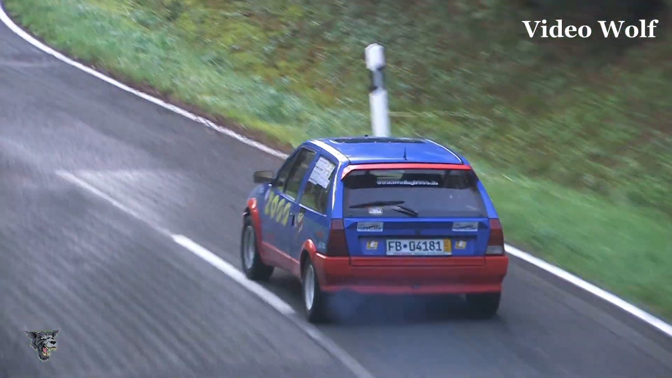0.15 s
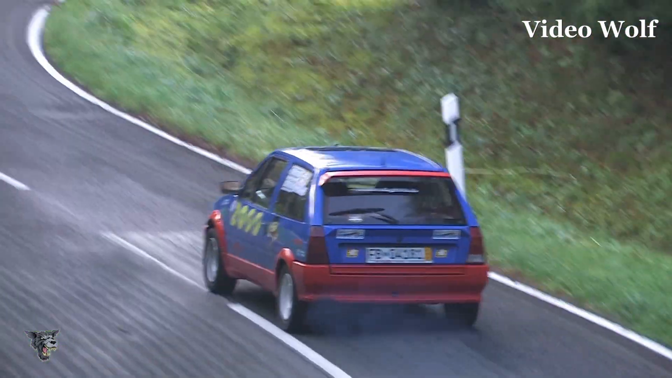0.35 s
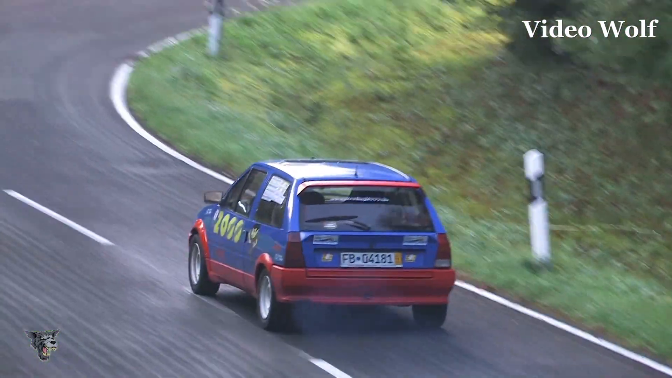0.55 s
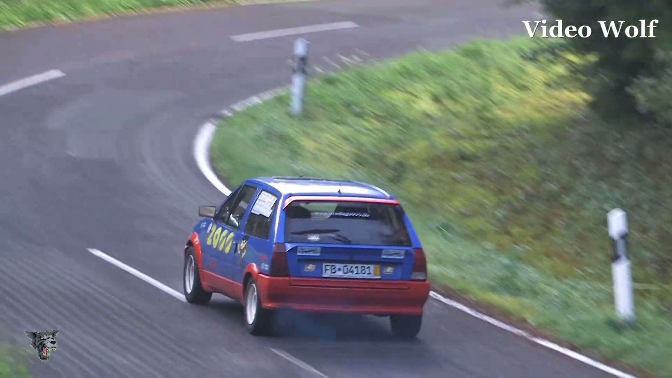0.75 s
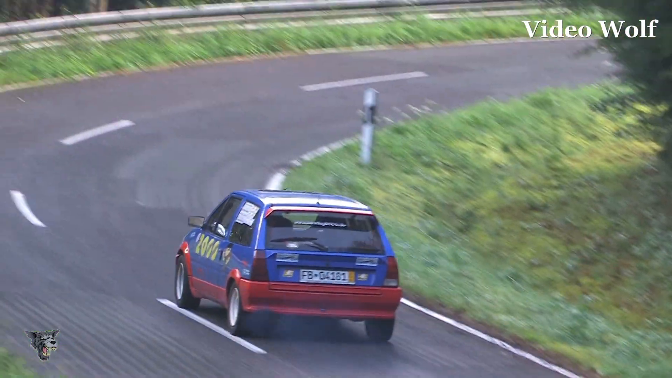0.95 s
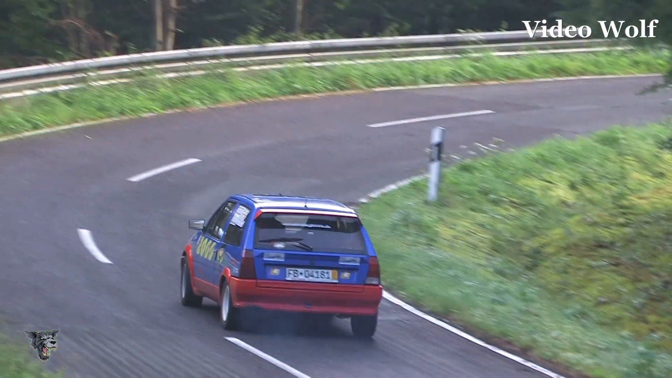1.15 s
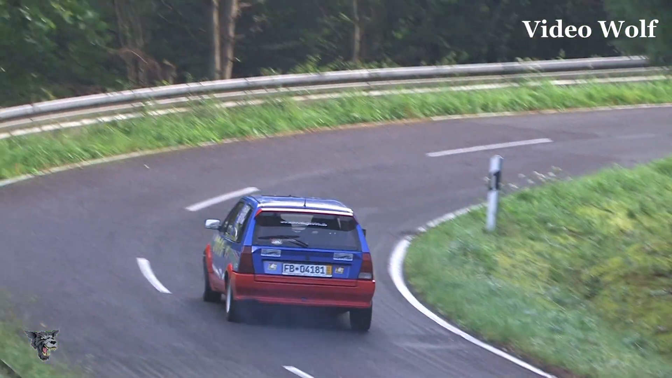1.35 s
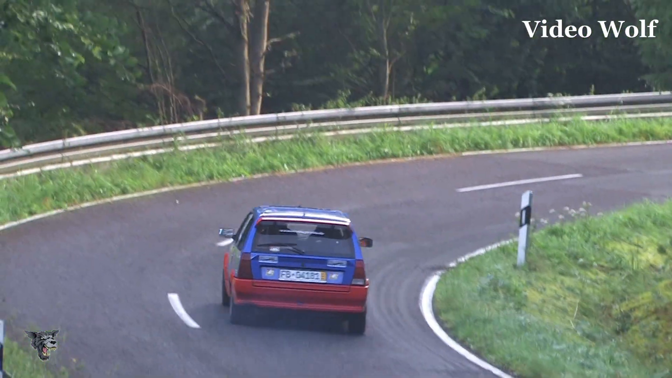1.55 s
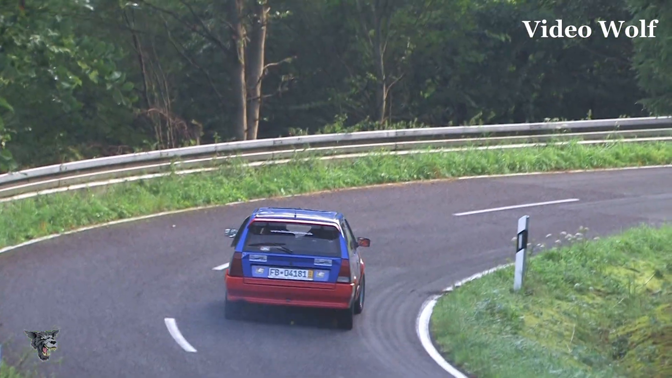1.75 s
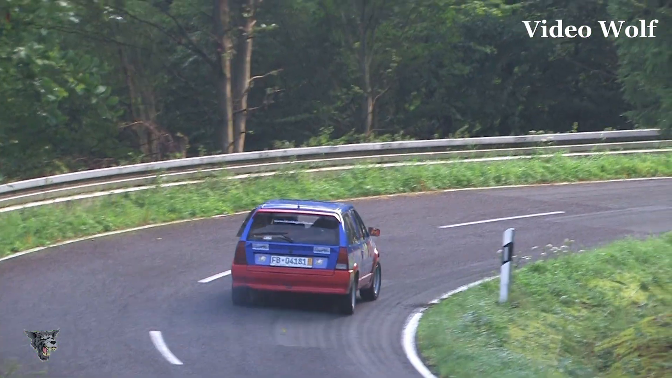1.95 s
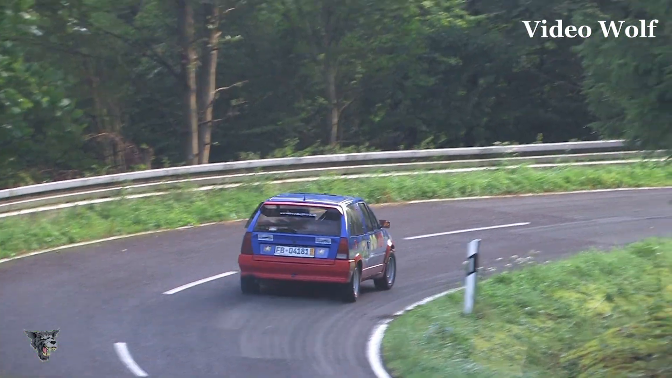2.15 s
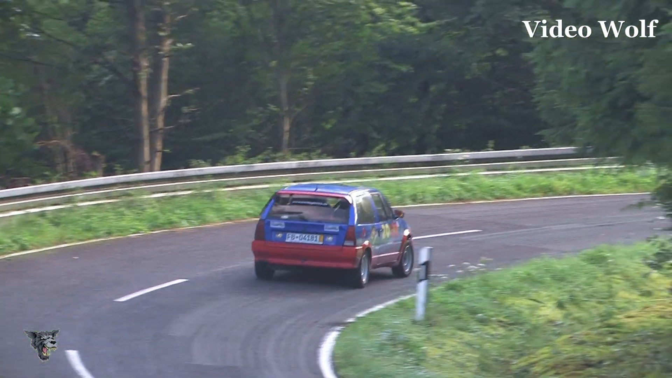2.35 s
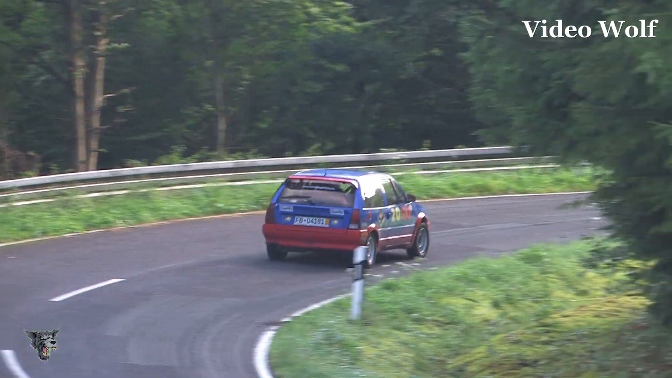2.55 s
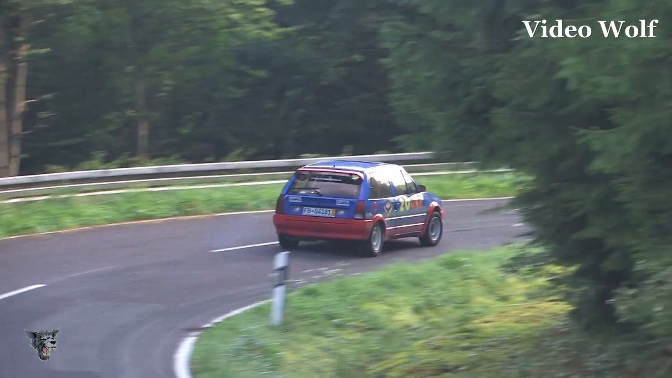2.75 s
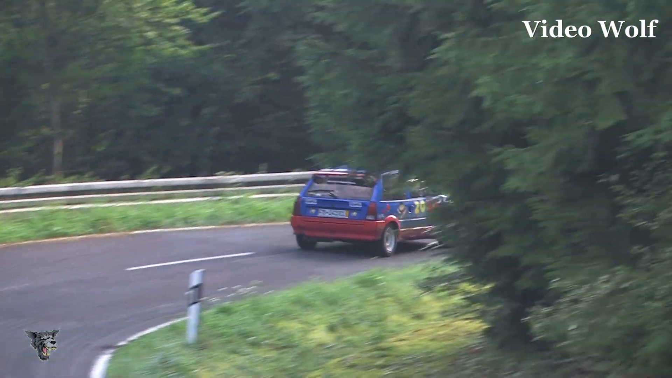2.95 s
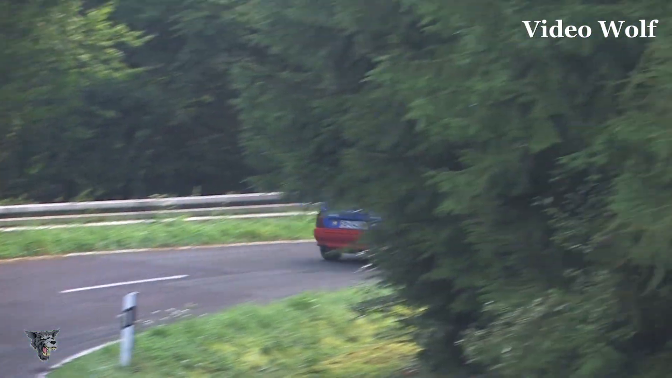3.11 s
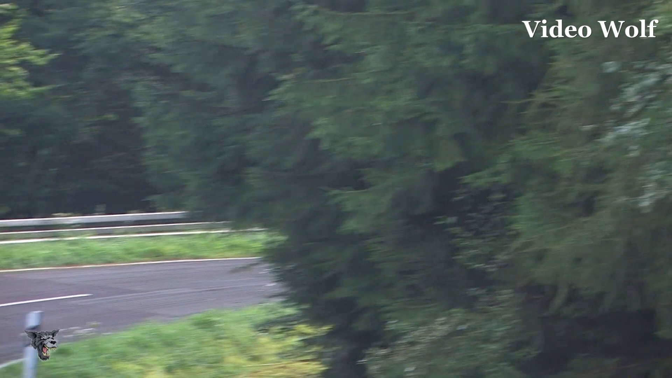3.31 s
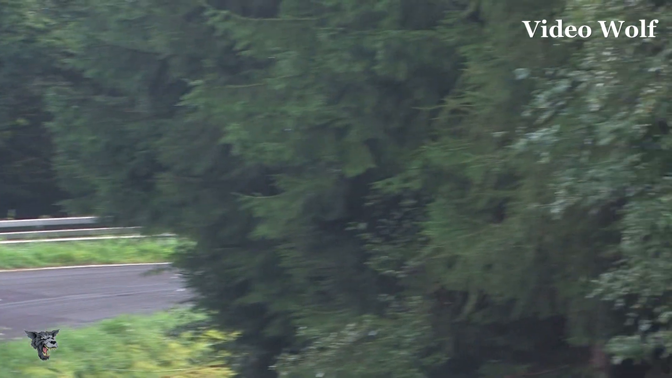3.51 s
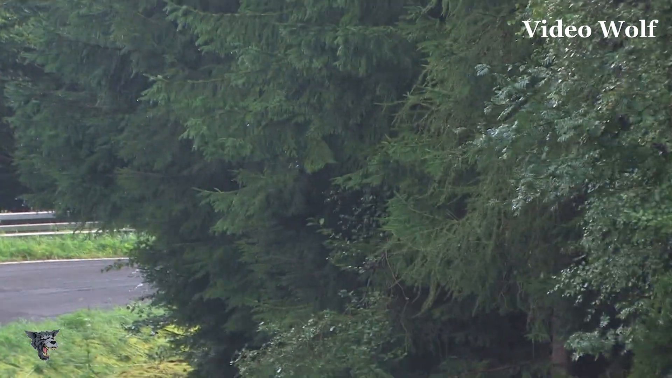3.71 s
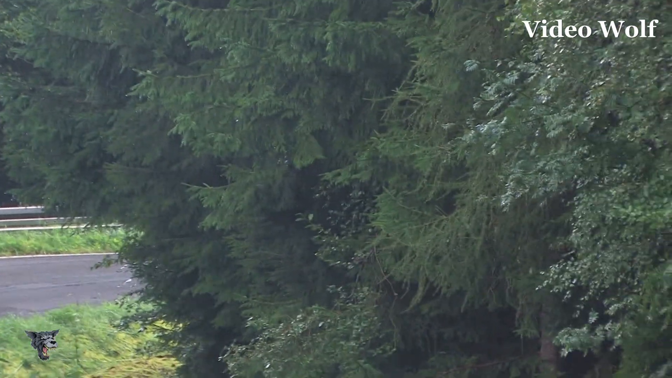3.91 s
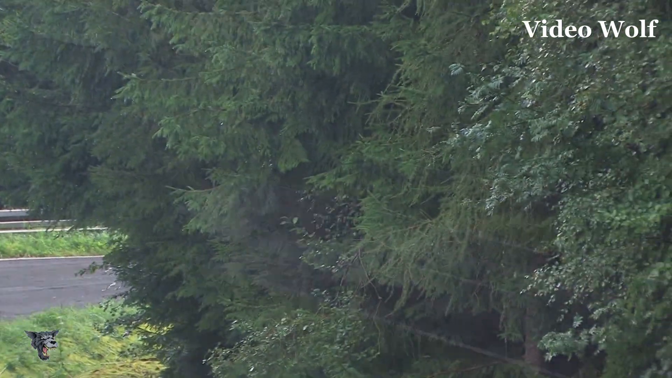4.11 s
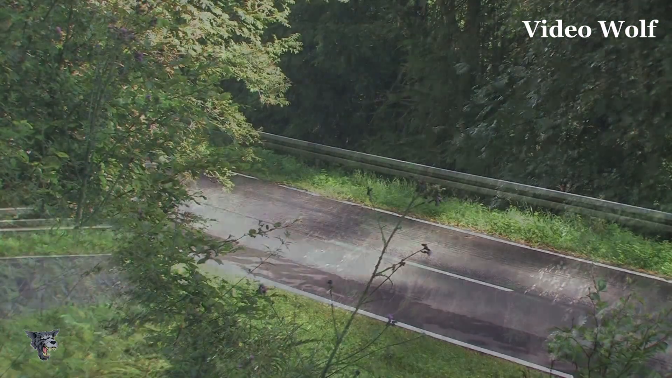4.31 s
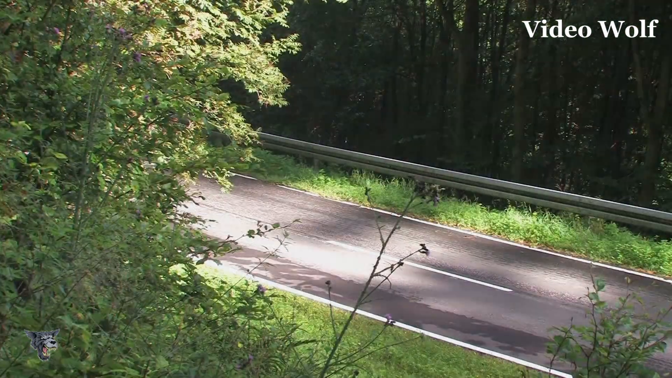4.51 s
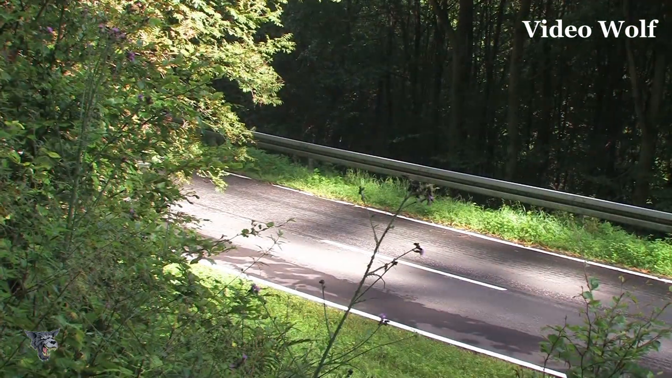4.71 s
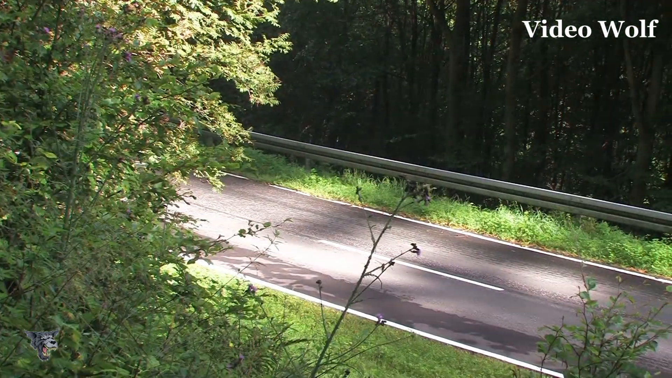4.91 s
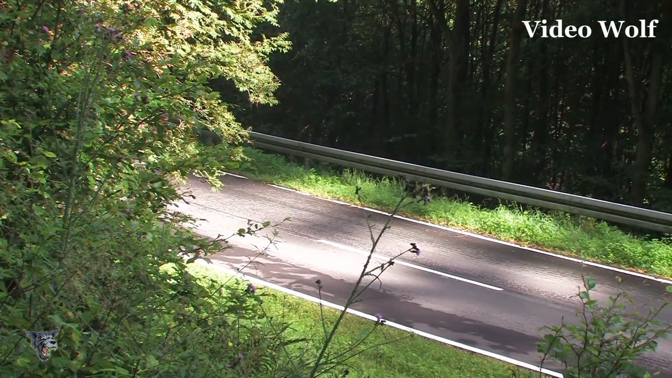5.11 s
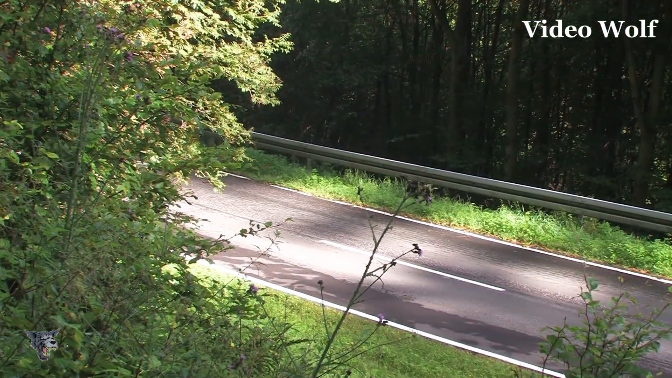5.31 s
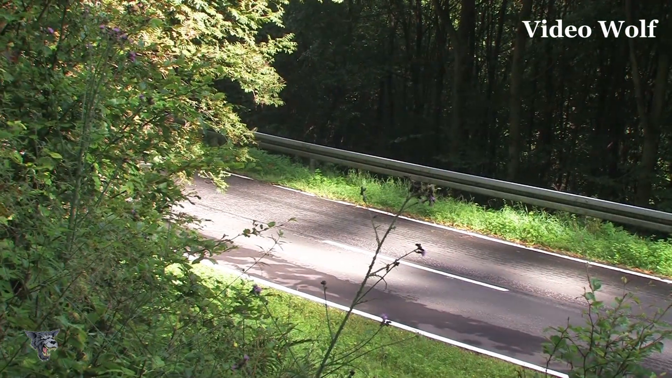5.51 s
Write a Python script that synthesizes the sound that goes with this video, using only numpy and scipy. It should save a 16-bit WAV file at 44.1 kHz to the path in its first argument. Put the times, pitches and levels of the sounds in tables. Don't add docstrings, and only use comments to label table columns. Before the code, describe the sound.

On a forest road, a small four-cylinder race car pulls away loudly, its pitch climbing, then lifts with a clunk, blips briefly, shifts up and fades behind trees. The scene crossfades to a quieter bend where an unseen second car approaches, its tyres squeal under braking and the engine drops to a lower note. A roadside microphone catches faint grit ticks.

```python
import sys
import numpy as np
from scipy import signal
from scipy.fft import rfft, irfft, next_fast_len
from scipy.io import wavfile
from scipy.ndimage import uniform_filter1d, map_coordinates

SR = 44100
rng = np.random.default_rng(int(sys.argv[2]) if len(sys.argv) > 2 else 0)


def how_loud(loudness_db):
    steps = np.asarray(loudness_db, float) / 20
    return 10 ** steps


def dump_mix(stems):
    frames = np.atleast_2d(stems).T
    limited = np.clip(frames, -1, 1)
    pcm = np.round(limited * 32767).astype(np.int16)
    wavfile.write(sys.argv[1], SR, pcm)


N = 245195
STEP = 8


# [t/s, f/Hz, level/dB]
ENGINE = [(0, 83.46, -19), (.2, 81.75, -18), (1.01, 88.76, -23.5), (1.32, 92, -21.5), (1.43, 95.3, -20.5),
          (1.69, 99.24, -20.5), (1.79, 97.85, -23.5), (2.05, 99.75, -22), (2.26, 104.1, -22),
          (2.44, 106.6, -23), (2.775, 85.58, -31.5), (2.885, 100.5, -31), (2.99, 91, -33),
          (3.12, 78.35, -27.5), (3.46, 71.95, -30.5), (3.76, 70.97, -29), (4.1, 70.75, -36.5),
          (4.5, 72.7, -47)]
# [t/s, level/dB]
ROAR_LEVEL = [(0, -33.5), (.35, -34), (.62, -35), (1.11, -36), (2.05, -36.5), (2.39, -35), (2.5, -36),
              (2.78, -40), (2.89, -36), (3.12, -36.5), (3.42, -43), (3.71, -44.5), (4.01, -52), (4.25, -55),
              (4.4, -55)]
# [multiple, level/dB x 4]
STRONG_ORDERS = [(3, -17, -11, -17, -17), (4, -5, -7.5, -5, -12.5), (5, -17, -24, -11, -23),
                 (6, -20.5, -12, -16, -15), (7, -21, -19.5, -39, -28.5), (8, -18.5, -17, -29, -20.5)]
# [multiple, level/dB, level/dB]
MINOR_ORDERS = [(.5, -58.5, -29.5), (1, -23.5, -31), (1.5, -32, -22.5), (2.5, -31, -36), (3.5, -34, -33.5),
                (4.5, -29.5, -38), (5.5, -30.5, -23), (6.5, -21.5, -33), (7.5, -34, -27.5),
                (8.5, -28, -28.5), (9, -27.5, -25.5), (9.5, -24, -35), (10, -25.5, -31), (10.5, -26, -31.5),
                (11, -19.5, -23), (11.5, -34.5, -37), (12, -28.5, -22), (12.5, -30.5, -35),
                (13, -26.5, -29.5), (13.5, -28, -28), (14, -25, -25), (14.5, -39, -40), (15, -20.5, -25),
                (15.5, -37, -31), (16, -26.5, -29), (16.5, -34.5, -35.5), (17, -27, -39.5),
                (17.5, -35.5, -35), (18, -32, -23.5), (18.5, -37.5, -37.5), (19, -38, -38)]
# [f/Hz, level/dB]
SILENCER_COLOUR = [(210, 1.5), (300, 0), (365, -20), (430, -2), (540, 13.5), (610, 6.5), (700, -7),
                   (860, 2.5)]
# [f/Hz, level/dB]
PIPE_COLOUR = [(60, 0), (250, 0), (360, -4), (560, 3), (680, 0), (760, -8), (950, 1), (1080, 0), (1230, -5),
               (1540, -1), (1750, -6)]
# [t/s, half length/s, added shaft f/Hz]
DRIVELINE_SURGES = [(1.918, .04, .7), (2.0, 0.029, -0.62), (2.22, .04, 0.81), (2.361, .05, -1.72),
                    (3.22, 0.039, .9), (3.351, 0.029, 0.94), (3.63, .04, 1), (3.72, 0.0346, -1.9),
                    (3.815, 0.041, 1.5), (3.91, .04, -1.3), (4.0, .03, .6)]
# [t/s, half length/s, level/dB]
FIRING_DIPS_AND_LIFTS = [
    (2.474, 0.016, -3),
    (2.756, 0.03, 1.5),
    (2.63, 0.047, -0.5),
    (3.32, 0.046, -1),
    (3.76, .03, 1.5),
    (3.95, 0.051, 2),
    (1.03, 0.13, -1),
]
# [t/s, half length/s, multiple, level/dB]
ORDER_RISES_AND_FALLS = [(0.23, 0.066, 8, -10), (0.55, 0.3, 8, 9), (0.76, .2, 5, 3), (0.56, 0.65, 4, 2),
                         (1.05, 0.19, 6, 6), (1.18, .14, 5, -9.5), (1.16, 0.082, 4, -6), (1.52, 0.28, 8, -13),
                         (1.67, 0.13, 4, -7), (1.6, 0.22, 3, -5.5), (1.7, 0.37, 7, -9.5), (2.325, 0.14, 4, 6),
                         (2.33, 0.12, 5, 8), (2.52, .1, 3, -13), (2.63, 0.06, 5, 7), (2.88, 0.075, 4, 9),
                         (4.1, 0.063, 6, 1), (2.7, 0.053, 4, -22), (3.27, 0.15, 8, -16), (3.58, 0.03, 8, 8),
                         (3.697, 0.033, 8, -3), (3.88, 0.038, 8, 5), (3.63, 0.039, 4, 6.5), (3.95, 0.18, 3, -6),
                         (2.58, 0.12, 8, 9), (2.463, 0.022, 4, -19), (2.3, 0.027, 6, -5), (2.9, 0.081, 3, 6.5),
                         (3.19, 0.093, 6, -6), (4.16, 0.16, 4, 8), (3.9, .6, 1.5, -18), (4.1, .25, .5, -11),
                         (3.3, .25, .5, -12), (1.0, .15, 6.5, -9), (0.17, .15, 2.5, 11.5), (2.57, 0.16, 3, -6),
                         (4.01, .04, 8, 4), (1.4, .12, 8, -7.5), (4.39, 0.19, 8, 9), (4.17, 0.11, 6, 6),
                         (4.2, 0.052, 4, -8), (1.1, 0.14, 5, -6), (2.32, 0.14, 8, -5), (2.67, .07, 4, 16),
                         (2.463, 0.017, 5, -5), (2.1, 0.33, 7, -8), (3.1, .1, 4.5, -8), (1.7, .2, 7, 2),
                         (2.38, .05, 6, 3), (4.15, .1, 8, 6)]
# [t/s, half length/s, multiple,
# level/dB]
PIPE_SWELLS = [(0.32, 0.2, 11, -40.5), (1.07, 0.17, 17, -37), (1.1, 0.22, 13, -39), (1.2, 0.52, 11, -49),
               (1.95, 0.22, 10, -40), (2.09, 0.15, 13, -44.5), (2.36, 0.09, 9, -41), (2.74, 0.15, 10, -53),
               (3.52, 0.099, 15, -51.5), (2.8, 0.1, 14, -53), (3.9, 0.096, 12, -59),
               (1.89, 0.69, 2.5, -39.5), (1.85, 0.32, 4.5, -46), (4.24, 0.17, 1, -59),
               (0.96, 0.23, 7.5, -40), (1.19, 0.27, 10, -39), (2.88, 0.072, 10, -42),
               (1.5, 0.17, 5.5, -38.5), (2.15, 0.17, 5.5, -39), (2.68, .17, 5.5, -40),
               (2.33, 0.17, 4.5, -41), (3.13, 0.1, 2.5, -44.5), (1.1, 0.19, 9, -44), (2.08, 0.26, 9, -44),
               (.7, .12, 10.5, -48), (0.81, .14, 10.5, -47), (2.16, .17, 10.5, -46),
               (0.37, 0.72, 11.5, -44.5), (1.2, 0.24, 11.5, -42.5), (0.12, .12, 12, -41.5),
               (0.95, 0.26, 12, -39), (.3, .25, 13, -42.5), (.2, 0.13, 16.5, -51), (1.27, .16, 16.5, -43.5),
               (0.35, .2, 18.5, -44.5), (.85, 0.13, 18.5, -46), (2.33, 0.065, 18.5, -53),
               (0.28, .26, 19, -44.5), (0.99, .11, 19, -45), (1.5, 0.055, 19, -51),
               (0.66, 0.37, 6.5, -37.5), (0.34, 0.45, 3.5, -39), (4.1, .12, 7.5, -46.5),
               (3.43, 0.17, 7.5, -43.5), (3.5, 0.13, 14, -53), (2.75, 0.34, 1, -58), (1.45, 0.096, 10, -39),
               (3.72, .12, 15, -48), (2, .1, 12, -51), (2.18, .1, 13, -47), (1.92, .1, 10.5, -44.5),
                     (4.15, .12, 9, -52), (3.8, .08, 9, -50), (.15, .15, 9, -49), (.7, .12, 9, -49),
                     (3.7, .1, 10, -58)]
# [f/Hz, level/dB per Hz]
ROAR_COLOUR, HISS_COLOUR = [(25, -23.5), (70, -11), (125, -8.5), (250, 4.5), (380, -7.5), (560, 6.5),
                            (740, -5), (1000, 2), (1250, -2.5), (1600, -0.5), (2100, -2), (2700, -8),
                            (4400, -13), (5200, -31.5), (6200, -59.5)], [(4200, -31), (4800, 2.5), (5600, -3), (6600, 1.5), (8800, -4.5),
                                          (9600, -11.5), (11300, -18.5), (11900, -24), (13600, -23)]
# [f/Hz, share]
FIRST_ALIKE = [(60, 1), (170, 1.0), (500, 0.97), (1450, 0.94), (4200, 0.87), (7000, 0.89), (9800, 0.95),
               (12500, .5)]
# [f/Hz, level/dB]
FIRST_LEAN = [(60, -1.0), (170, -1.27), (500, -1.37), (1450, -1), (4200, -0.095)]
# [t/s, f/Hz, level/dB, length/s]
RASP_PUFFS = [(2.341, 2033, -37, .2), (2.367, 2250, -35, 0.03), (2.43, 5100, -50.5, 0.039),
              (2.619, 2840, -47.5, 0.34), (2.655, 6470, -60, 0.027), (2.892, 2780, -45.5, .35),
              (3.094, 4700, -48, 0.008), (3.094, 3600, -43, .012), (2.86, 3700, -42, .015),
              (2.96, 4700, -50, .015), (3.499, 1500, -45, .45), (3.05, 1566, -44, .35),
              (2.795, 480, -35, .03), (2.368, 1500, -41, .025), (2.36, 1050, -40, .03),
              (2.985, 1020, -43, .04), (3.195, 3300, -47, .01), (3.2, 1600, -42, .03)]

# [t/s, level/dB]
SECOND_ROAR_LEVEL = [
    (4.3, -51),
    (4.44, -44),
    (4.636, -38.5),
    (4.94, -39.5),
    (5.024, -38),
    (5.392, -37),
    (5.56, -37),
]
# [t/s, f/Hz, level/dB]
HERALD_PATH = [
    (4.24, 147.5, -64),
    (4.33, 149, -56),
    (4.48, 150.5, -44),
    (4.57, 151, -64),
]
# [t/s, f/Hz, level/dB]
DIRECT_PATH = [(4.22, 146.4, -62.5), (4.32, 146.5, -54), (4.43, 149.3, -56), (4.49, 149.9, -46),
               (4.6, 151.1, -44), (4.72, 151.8, -42.5), (4.85, 153.6, -43.5), (4.95, 148.5, -48),
               (5.05, 150.5, -53), (5.15, 150, -71)]
# [t/s, f/Hz, level/dB]
HILLSIDE_PATH = [(4.4, 133.9, -75), (4.55, 133.4, -54), (4.7, 136.2, -51.5), (4.85, 134, -53),
                 (4.96, 134.8, -61), (5.025, 137, -44.5), (5.07, 138.7, -59), (5.11, 140.2, -49),
                 (5.18, 141.5, -44.5), (5.27, 139, -70)]
# [t/s, f/Hz, level/dB]
LOWER_GEAR_PATH = [(5.2, 125.1, -63.5), (5.25, 125.6, -48.5), (5.31, 123.6, -45.5), (5.335, 112.6, -54),
                   (5.37, 112.7, -46), (5.46, 109.7, -45), (5.56, 112.2, -46.5)]
# [multiple, level/dB]
DIRECT_ORDERS, HILLSIDE_ORDERS, LOWER_GEAR_ORDERS = [(.5, -12), (1, -18), (2, -3.5), (2.5, -17),
                                                     (3.5, -7.5), (4, -0.5), (4.5, -12), (5, -23),
                                                     (5.5, -5), (6, -3), (6.5, -27), (8.5, -9), (10.5, -12),
                                                     (11.5, -12)], [(1, -6), (2, 7), (4, 2), (5, -21),
                                                                     (6, 0), (8, -5), (8.5, -6), (10, -11)], [(.5, -16), (1.1, -2.5),
                                                                                   (2, -2.5), (2.5, -1.5),
                                                                                   (4, -0.5), (4.2, -8),
                                                                                   (5.5, 0.5), (6, 3),
                                                                                   (6.5, -1.5), (7, 0.5),
                                                                                   (7.5, -5), (8, 2.5),
                                                                                   (9.5, -4.5), (10, -0.5),
                                                                                   (12, -6), (17.5, -6),
                                                                                   (14, -7)]
# [t/s, f/Hz, level/dB]
OUTER_TYRE, INNER_TYRE = [(4.8, 1755, -60), (4.88, 1727, -54), (4.92, 1720, -47), (4.945, 1700, -51),
                          (4.968, 1687, -40), (4.995, 1695, -52), (5.035, 1734, -36), (5.06, 1790, -49),
                          (5.085, 1810, -44), (5.105, 1805, -48), (5.125, 1785, -46.5), (5.155, 1730, -38),
                          (5.18, 1663, -51), (5.2, 1650, -39), (5.225, 1660, -52), (5.25, 1674, -44),
                          (5.285, 1700, -45), (5.33, 1656, -51), (5.37, 1620, -57)], [(4.92, 1430, -60), (4.97, 1415, -48), (5.01, 1395, -43),
                                          (5.04, 1350, -52), (5.06, 1210, -46), (5.1, 1190, -44),
                                          (5.14, 1220, -51), (5.2, 1160, -49), (5.25, 1150, -60)]
# [f/Hz, level/dB per Hz]
SECOND_ROAR_COLOUR = [(25, -11), (70, -7), (110, -5.5), (190, -13), (270, -6), (370, -12.5), (460, -6.5),
                      (700, -1.5), (1000, -7), (1600, -4), (2100, -10.5), (3800, -20), (4600, -29),
                      (5500, -38), (7000, -35.5), (9000, -46), (13000, -59)]
# [f/Hz, share]
SECOND_ALIKE = [(60, 1.0), (170, 1), (500, 0.98), (1450, 0.89), (4200, 0.59)]
# [f/Hz, level/dB]
SECOND_LEAN = [(60, -0.67), (170, -0.83), (500, -0.21), (1450, 0.62), (4200, 2.0)]

# [t/s, level/dB, f/Hz]
DRIVELINE_CLUNKS = [
    (2.462, -23.5, 90),
    (2.78, -20, 74.2),
    (4.789, -23, 100),
]
# [t/s, peak level/dB]
GRIT_TICKS = [(2.3331, -56.5), (2.4029, -64), (2.6848, -62), (4.803, -73), (2.5094, -58.5), (2.5597, -62),
              (2.7876, -65), (2.8694, -62.5), (2.957, -59.5), (3.039, -59), (3.0929, -58.5)]
# [f/Hz, t/s]
TREE_DECAY = [(100, 0.67), (1000, 1), (6000, 0.046)]
# [f/Hz, level/dB per Hz]
FOREST_COLOUR = [(25, -27), (70, -17), (300, -23.5), (1000, -2), (3000, -28), (6000, -27), (13500, -47)]

LIFT_S, LIFT_RAMP_S = 2.42, 0.075
GEAR_S, GEAR_RAMP_S = 3.015, 0.14
WAKE_S = 0.49
MINOR_DB = (15.3, 12.3, 1, 18.3)
HISS_DB = (-17, -19, -18.5, -21)
PULSE_DEPTH = (.23, .18, .16, .13)


def first_car():
    t = seconds()
    shaft_hz, firing_db = curves(ENGINE)
    shaft_hz = uniform_filter1d(shaft_hz, round(.06 * SR))
    shaft_hz = shaft_hz + sum(hz * bump(t, s, half) for s, half, hz in DRIVELINE_SURGES)
    firing_db = firing_db + sum(db * bump(t, s, half) for s, half, db in FIRING_DIPS_AND_LIFTS)
    turns = np.cumsum(shaft_hz) / SR
    roar_db, = curves(ROAR_LEVEL)
    hz, spin, base_db, lead_db = coarse([shaft_hz, turns, roar_db, firing_db])
    tone = fine(strong_orders(hz, spin, lead_db) + minor_orders(hz, spin, base_db))
    noise = roar_and_hiss(turns, roar_db)
    car = tone + noise + how_loud(-29.0) * trees(tone)
    return lean(car * fade(-1, 4.42, ramp=0.21), FIRST_LEAN)


def strong_orders(hz, spin, lead_db):
    state = states(GEAR_RAMP_S)
    tone = order(spin, 2, lead_db, flutter_db=0.17 + 0.4 * state[-1], slip=0.1)
    for k, *state_db in STRONG_ORDERS:
        db = lead_db + rise_db(k) + state_db @ state + along(SILENCER_COLOUR, k * hz)
        tone += order(spin, k, db, flutter_db=.8 + .5 * state[-1], slip=0.09, drift_db=.45)
    return tone


def minor_orders(hz, spin, base_db):
    pattern_start_s, pattern_end_s = 0.75, 2.55
    geared = np.clip((seconds(STEP) - pattern_start_s) / (pattern_end_s - pattern_start_s), 0, 1)
    minor_db = MINOR_DB @ states(WAKE_S)
    tone = 0
    for k, pull_db, gear_db in MINOR_ORDERS:
        pattern_db = pull_db + geared * (gear_db - pull_db)
        db = base_db + rise_db(k) + minor_db + pattern_db + along(PIPE_COLOUR, k * hz)
        db = 10 * np.log10(how_loud(2 * db) + swell(k))
        tone += order(spin, k, db, flutter_db=.7 * np.sqrt(k), slip=.1, drift_db=.25 * np.sqrt(k))
    return tone


def roar_and_hiss(turns, roar_db):
    clear_db, dulling = -42, 0.36
    hiss_db = held(HISS_DB @ states(WAKE_S)) + dulling * np.minimum(roar_db - clear_db, 0)
    pulsing = firing(turns, depth=held(PULSE_DEPTH @ states(GEAR_RAMP_S)))
    roar_db = roar_db + held(.2 * wobble(9) + .6 * wobble(30))
    roar = how_loud(roar_db + 3.5) * pulsing * rush(ROAR_COLOUR, FIRST_ALIKE, patchy_db=0.43)
    hollow_hz, hollow_width, hollow_share = 760, 0.35, 0.29
    off_load = held(np.clip((seconds(STEP) - LIFT_S) / LIFT_RAMP_S, 0, 1))
    band = filtered(roar, lambda hz: np.exp(-(np.log((hz + 1) / hollow_hz) / hollow_width) ** 2))
    roar = roar - hollow_share * off_load * band
    hiss = how_loud(roar_db + hiss_db) * pulsing ** .3 * rush(HISS_COLOUR, FIRST_ALIKE, patchy_db=1.5)
    return roar + hiss


def firing(turns, depth):
    return 1 + depth * np.cos(4 * np.pi * turns) + 0.14 * depth * np.cos(np.pi * turns)


def states(gear_ramp_s):
    t = seconds(STEP)
    lifted = np.clip((t - LIFT_S) / LIFT_RAMP_S, 0, 1)
    geared = np.clip((t - GEAR_S) / gear_ramp_s, 0, 1)
    climb = np.clip(t / LIFT_S, 0, 1)
    return np.array([(1 - climb) * (1 - lifted), climb * (1 - lifted), lifted - geared, geared])


def rise_db(k):
    t = seconds(STEP)
    return sum(db * bump(t, s, half) for s, half, m, db in ORDER_RISES_AND_FALLS if round(2 * m) == 2 * k)


def swell(k):
    t = seconds(STEP)
    rows = [row for row in PIPE_SWELLS if round(2 * row[2]) == 2 * k]
    return sum(how_loud(2 * db) * np.exp(-2 * ((t - s) / half) ** 4) for s, half, _, db in rows)


def rasps():
    out = np.zeros(N + SR)
    for s, hz, db, length in RASP_PUFFS:
        t = np.arange(round(length * SR)) / SR
        grain = uniform_filter1d(rng.standard_normal((2, SR // 2)), size=60, axis=1)
        grain = uniform_filter1d(grain, size=130, axis=1, mode="wrap")[:, :len(t)]
        puff = unit(grain[0] * np.cos(2 * np.pi * hz * t) + grain[1] * np.sin(2 * np.pi * hz * t))
        out[round(s * SR) - len(t) // 2:][:len(t)] += how_loud(db) * np.hanning(len(t)) * puff
    return out[:N]


def second_car():
    tone = fine(second_engine() + tyre_squeal())
    roar = how_loud(curves(SECOND_ROAR_LEVEL)[0] + 2.5) * rush(SECOND_ROAR_COLOUR, SECOND_ALIKE, patchy_db=1.0)
    dull_s, dull_hz, dull_share = 5.38, 2300, 0.31
    top = filtered(roar, lambda hz: 1 / (1 + (dull_hz / (hz + 1)) ** 6))
    roar = roar - dull_share * fade(dull_s, 6, ramp=0.093) * top
    car = tone + roar + how_loud(-20.5) * trees(tone)
    return lean(car * fade(4.07, 6, ramp=0.83), SECOND_LEAN)


def second_engine():
    paths = ((DIRECT_PATH, DIRECT_ORDERS), (HILLSIDE_PATH, HILLSIDE_ORDERS),
             (LOWER_GEAR_PATH, LOWER_GEAR_ORDERS), (HERALD_PATH, [(6, 0), (5.2, -4.5)]))
    tone = 0
    for path, orders in paths:
        hz, level_db = coarse(curves(path))
        turns = np.cumsum(hz) * STEP / SR
        for k, db in orders:
            tone += order(turns, k, level_db + db, flutter_db=1.7, slip=0.13)
    return tone


def tyre_squeal():
    tone = 0
    for tyre, start, stop in ((OUTER_TYRE, 4.4, 5.38), (INNER_TYRE, 4.92, 5.25)):
        hz, db, grip = coarse([*curves(tyre), fade(start, stop, ramp=.04)])
        turns = np.cumsum(hz) * STEP / SR
        db = db + 1 + 2 * wobble(70)
        tone += order(turns, 1, db, flutter_db=.8, slip=0.32 + 0.25 * wobble(120)) * grip
    return tone


def knocks():
    out, t = np.zeros(N + SR), np.arange(SR // 10) / SR
    for s, db, hz in DRIVELINE_CLUNKS:
        envelope = how_loud(db - 6.5 - 60 * t / 0.042) * (1 - np.exp(-t / 0.0036))
        out[round(s * SR):][:len(t)] += envelope * np.sin(2 * np.pi * hz * t)
    for s, db in GRIT_TICKS:
        crack = np.diff(rng.standard_normal(len(t) + 3), 3) / 7
        out[round(s * SR):][:len(t)] += how_loud(db + 12 - 60 * t / .005) * crack
    return out[:N]


def trees(x):
    hz, t, z = signal.stft(rng.standard_normal((2, SR // 2)), SR, nperseg=256)
    decay = how_loud(-60 * t / along(TREE_DECAY, hz)[:, None])
    tail = signal.istft(z * decay, SR, nperseg=256)[1]
    late = np.pad(x, (1500, 0))[None]
    return signal.fftconvolve(late, tail / np.linalg.norm(tail[0]), axes=1)[:, :N]


def forest():
    return how_loud(-56) * rush(FOREST_COLOUR, SECOND_ALIKE, patchy_db=1.2)


def order(turns, k, db, flutter_db, slip, drift_db=0):
    phase = 2 * np.pi * (k * turns + rng.random()) + slip * np.sqrt(k) * wobble(30)
    level_db = db + flutter_db * wobble(14) + drift_db * wobble(3.54)
    return np.sqrt(2) * how_loud(level_db) * np.sin(phase)


def rush(spectrum, alike, patchy_db):
    z = signal.stft(rng.standard_normal((2, N + 512)), nperseg=512)[2]
    field = uniform_filter1d(rng.standard_normal(z.shape[1:]), size=4, axis=0)
    field = uniform_filter1d(field, size=12, axis=1)
    pair = signal.istft(z * how_loud(patchy_db * unit(field)), nperseg=512)[1][:, :N]

    def response(hz):
        turn = np.arccos(np.clip(along(alike, hz), -1, 1)) / 2
        return how_loud(along(spectrum, hz)) * [np.cos(turn), np.sin(turn)]

    mid, side = filtered(pair, response)
    return unit(np.array([mid + side, mid - side]))


def lean(x, balance):
    return filtered(x, lambda hz: how_loud(np.outer([.5, -.5], along(balance, hz))))


def filtered(x, response):
    m = next_fast_len(N + 8192)
    return irfft(rfft(x, m) * response(np.fft.rfftfreq(m, 1 / SR)), m)[..., :N]


def wobble(rate):
    sparse = np.arange(0, N + 64, 64)
    curve = map_coordinates(rng.standard_normal(1200), [sparse * min(rate, 190) / SR])
    return np.interp(np.arange(0, N, STEP), sparse, curve)


def seconds(step=1):
    return np.arange(0, N, step) / SR


def bump(t, s, half):
    return np.exp(-((t - s) / half) ** 2)


def fade(start, stop, ramp):
    t = seconds()
    return np.clip(np.minimum(t - start, stop - t) / ramp + 1, 0, 1)


def curves(rows):
    s, *cols = np.transpose(rows)
    return [np.interp(seconds(), s, c) for c in cols]


def along(points, hz):
    f, v = np.transpose(points)
    return np.interp(np.log(hz + 1), np.log(f + 1), v)


def coarse(x):
    return [c[::STEP] for c in x]


def fine(tone):
    return signal.resample_poly(tone, STEP, 1)[:N]


def held(x):
    return np.repeat(x, STEP)[:N]


def unit(x):
    return x / np.sqrt(np.mean(x ** 2) + 1e-20)


def scene():
    return first_car() + second_car() + rasps() + knocks() + forest()


def roll_off(x):
    return signal.sosfilt(signal.butter(12, 13650, fs=SR, output="sos"), x)


def record(dry):
    self_noise = how_loud(-76.5) * rng.standard_normal(dry.shape)
    heard = filtered(dry + self_noise, lambda hz: hz ** 2 / (hz ** 2 + 30 ** 2))
    return roll_off(heard)


dry = scene()
out = record(dry)
dump_mix(out)
```